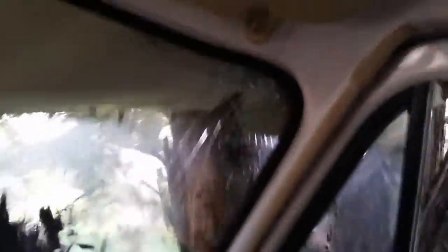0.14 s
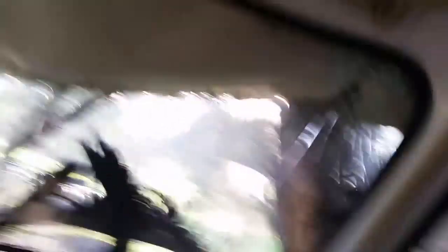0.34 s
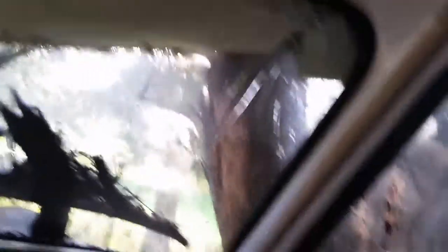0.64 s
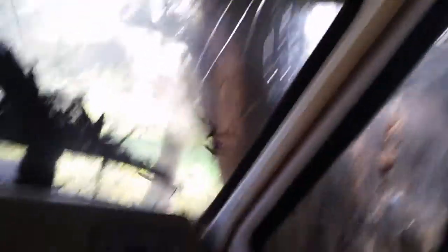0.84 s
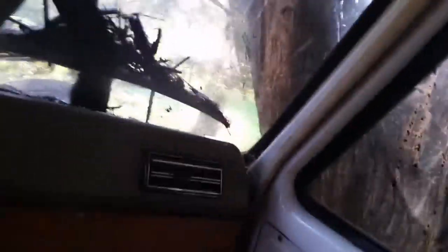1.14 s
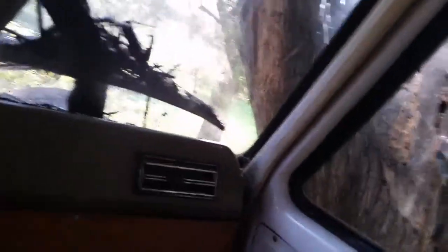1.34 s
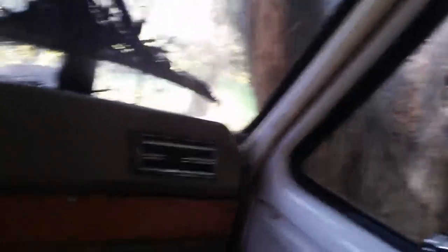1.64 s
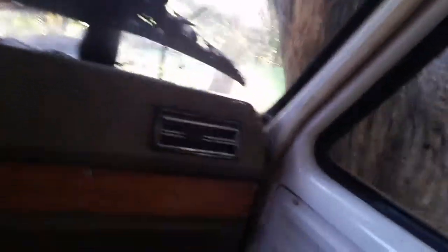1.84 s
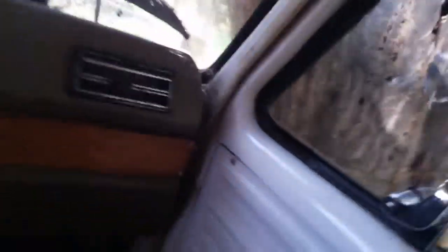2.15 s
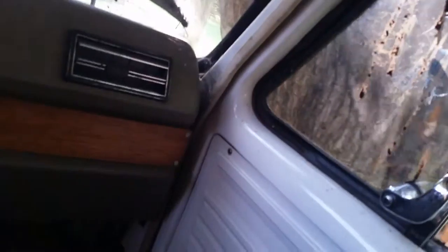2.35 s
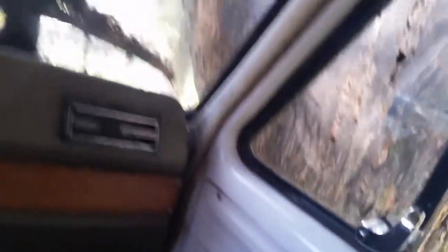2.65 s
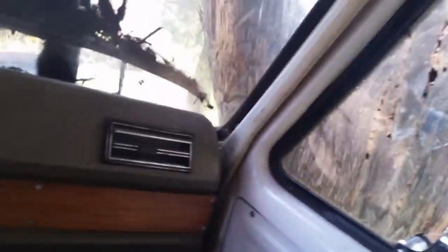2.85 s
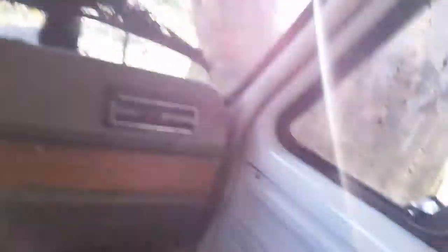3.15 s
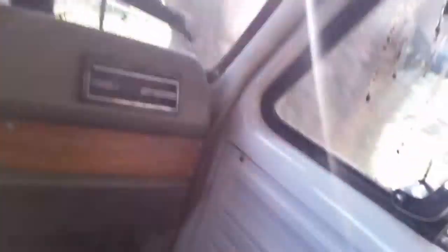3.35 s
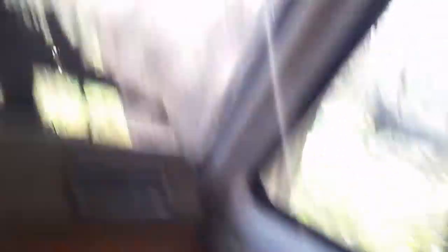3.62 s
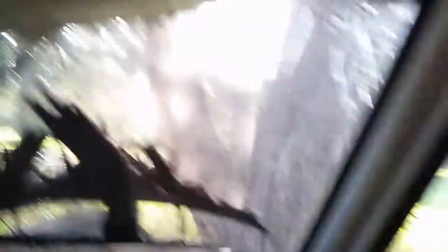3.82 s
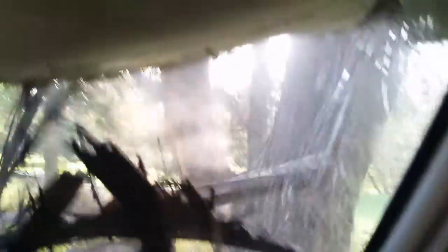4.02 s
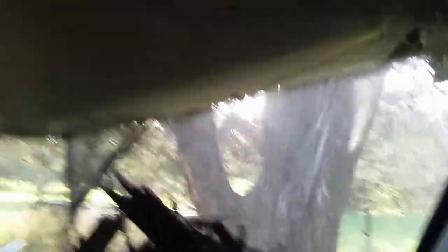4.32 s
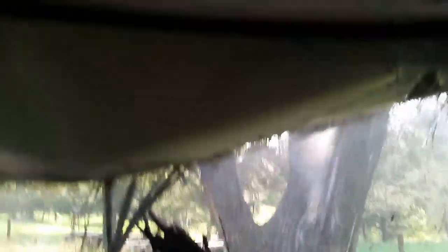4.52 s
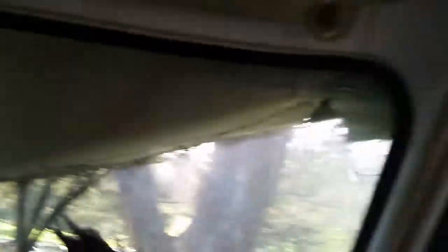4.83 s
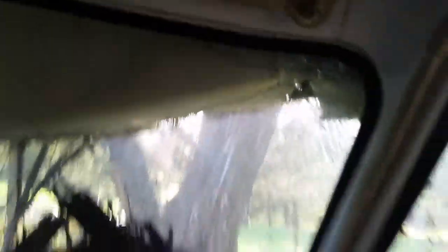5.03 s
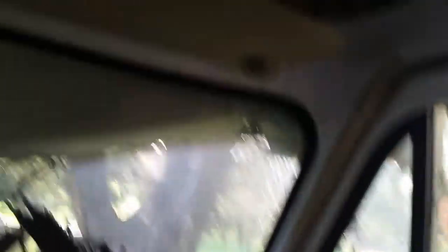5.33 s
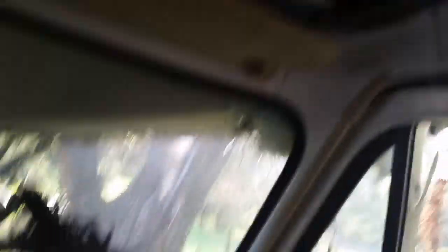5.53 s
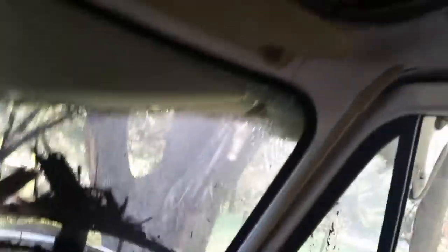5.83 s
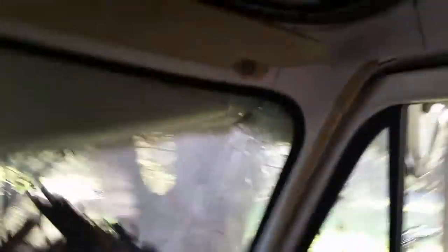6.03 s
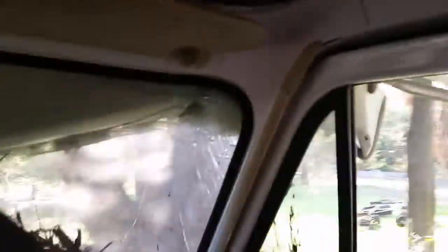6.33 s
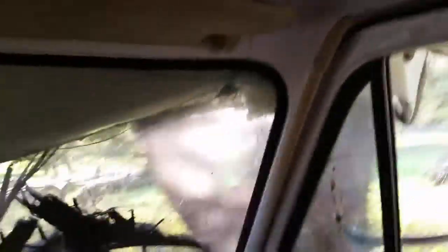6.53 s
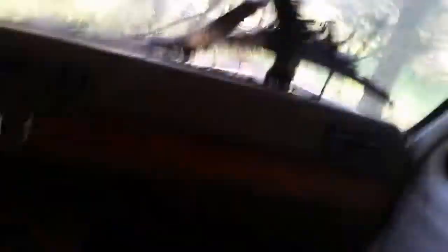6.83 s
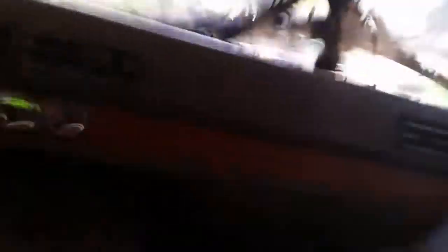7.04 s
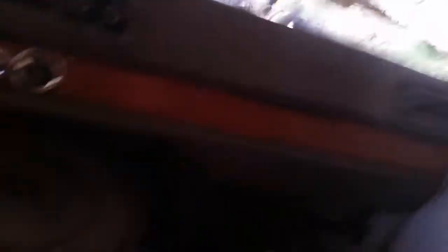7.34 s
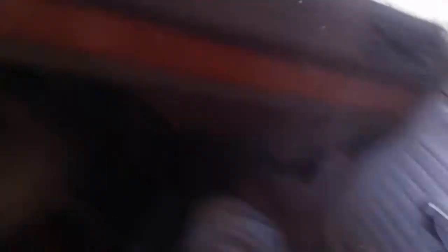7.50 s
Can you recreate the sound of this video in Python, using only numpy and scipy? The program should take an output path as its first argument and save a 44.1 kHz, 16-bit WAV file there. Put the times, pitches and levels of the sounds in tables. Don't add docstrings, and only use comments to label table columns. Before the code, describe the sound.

A rough old truck engine revs, bogs down and revs again inside the cab, with hissing exhaust leak, belt squeal and a splintering branch crash.

```python
import sys
import numpy as np
from scipy import signal
from scipy.io import wavfile
from scipy.ndimage import uniform_filter1d

SR = 44100
rng = np.random.default_rng(int(sys.argv[2]) if len(sys.argv) > 2 else 0)


def rack_gain(trim_db):
    fader = np.asarray(trim_db, float)
    return 10 ** (fader / 20)


def waveform_to_disk(signal):
    frames = np.transpose(np.atleast_2d(signal))
    scaled = np.clip(frames, -1, 1) * 32767
    samples = np.round(scaled).astype(np.int16)
    wavfile.write(sys.argv[1], SR, samples)


N = 338247
PORT_S = 0.000387


def evened(x):
    return x / np.sqrt(np.mean(x ** 2) + 1e-20)


def read(points, hz):
    f, value = np.transpose(points)
    return np.interp(np.log(hz + 1), np.log(f + 1), value)


def curve(rows, index):
    rows = np.array(rows)
    return np.interp(np.arange(N) / SR, rows[:, 0], rows[:, index])


def spells(rows):
    t = np.arange(N) / SR
    gain = np.zeros(N)
    for s, rise, end, fall, db, fade_db in rows:
        edges = np.clip((t - s) / rise, 0, 1) * np.clip(1 - (t - end) / fall, 0, 1)
        gain += edges * rack_gain(db + fade_db * (t - s))
    return gain


def add(mix, s, sound):
    part = mix[..., round(s * SR):][..., :sound.shape[-1]]
    part += sound[..., :part.shape[-1]]


def pan(db):
    return rack_gain(np.array([[.5], [-.5]]) * db)


def decay(t, db, t60):
    return rack_gain(db - 60 * t / t60)


def resonate(x, hz, width):
    return signal.lfilter(*signal.iirpeak(hz, hz / width, SR), x)


def resonate_twice(x, hz, width):
    return resonate(resonate(x, hz, width), hz, width)


def glide(x, hz, width):
    turn = np.exp(2j * np.pi * np.cumsum(hz) / SR)
    r = np.exp(-np.pi * width / SR)
    return evened((turn * signal.lfilter([1], [1, -2 * r, r * r], x / turn)).real)


def causal(spectrum):
    log_gain = np.log(rack_gain(read(spectrum, abs(np.fft.fftfreq(2 ** 15, 1 / SR)))))
    return np.fft.ifft(np.exp(np.conj(signal.hilbert(log_gain)))).real[:8192]


# (frequency [Hz], likeness [0 to 1])
PORT_LIKENESS = [(60, .99), (130, .96), (300, .88), (640, .75), (1300, .6), (3000, .4), (8000, .35),
                 (15000, .25)]
# (frequency [Hz], level [dB])
PORT_LEAN = [(60, -1), (250, -2), (1000, -2.5), (2500, -5), (5000, -8), (7000, -13.5), (9000, 15),
             (11500, 2), (14500, -3)]


def noise(spectrum, patchy_db, size, side=1):
    frames, hz = 4 * N // size + 5, np.fft.rfftfreq(size, 1 / SR)
    a, b, c, d, patches = rng.standard_normal((frames, len(hz), 5)).T
    patches = evened(uniform_filter1d(uniform_filter1d(patches, size=9, axis=0), size=9, axis=1))
    same = np.clip(read(PORT_LIKENESS, hz), 0, 1)[:, None]
    lag_s = side * PORT_S * np.clip(hz / 700 - .5, 0, 1)
    late = np.exp(-2j * np.pi * hz * lag_s)[:, None]
    left = a + 1j * b
    right = same * late * left + np.sqrt(1 - same ** 2) * (c + 1j * d)
    lean = read(PORT_LEAN, hz)[:, None] / 2
    level_db = read(spectrum, hz)[:, None] + patchy_db * patches + np.array([lean, -lean])
    z = np.array([left, right]) * rack_gain(level_db)
    return evened(signal.istft(z, nperseg=size, noverlap=3 * size // 4)[1][:, :N])


# (time [s], rate [firings per s])
SPEED = [(0.0, 98.12), (0.805, 94.22), (0.967, 77.52), (1.208, 79.67), (1.368, 55.81), (1.57, 50.45),
         (1.807, 93.19), (3.106, 106.16), (3.427, 85.06), (3.771, 46.42), (4.555, 55.68), (4.824, 71.73),
         (5.128, 50.28), (5.942, 56.92), (6.402, 90.01), (6.938, 76.09), (7.147, 98.42), (7.67, 96.69)]


def speed():
    size = round(.105 * SR)
    return uniform_filter1d(uniform_filter1d(curve(SPEED, index=1), size, mode="nearest"), size, mode="nearest")


def bogged():
    return np.clip((75 - speed()) / 18, 0, 1)


def firings():
    count = 8 * -.355 + np.cumsum(speed()) / SR
    at = np.flatnonzero(np.diff(np.floor(count))) + 1
    return at, np.floor(count[at]).astype(int) % 8, count


# (time [s], throttle [dB], pull on the wheels [dB])
THROTTLE = [(0, 7, 0), (.5, -0.5, -0.5), (.9, -4, 0.5), (1.18, -2, -1), (1.4, -8, -8), (1.72, -1, -8),
            (1.85, -1.5, 1), (3.1, 5.5, 1), (3.62, -5, -4.5), (3.88, -5, -9), (4.3, -4, -7.5),
            (4.72, 5, -1), (5.3, 3.5, -1), (6.1, 6, -2), (6.7, 4.5, -0.5), (7.08, 6, -2.5), (7.4, -4.5, -2),
            (7.67, 0, -6)]


def effort():
    return curve(THROTTLE, index=1), curve(THROTTLE, index=2)


# (start [s], rise [s], end [s], fall [s], level [dB], fade [dB per s])
BRUSH = [
    (0, .01, 0.15, 0.65, -53, -9.5),
    (4.5, 0.53, 7.2, 0.35, -46, -0.9),
         (5.938, .015, 5.974, .03, -35, 0),
]
# (frequency [Hz], density [dB per Hz])
TWIGS = [(1500, -28), (2200, 5), (4500, 13), (6500, -30), (7200, -21.5)]


def twigs():
    return spells(BRUSH) * noise(TWIGS, patchy_db=2.2, size=512)


# (start [s], rise [s], end [s], fall [s], level [dB], fade [dB per s])
SQUEAL = [
    (1.456, 0.044, 3.28, 0.23, -44.5, -4),
    (4.2, 0.42, 5.3, 0.44, -47, -10),
    (2.896, 0.102, 3.126, 0.21, -44.5, 0.5),
]
# (time [s], pitch [Hz])
SQUEAL_PITCH = [(0, 2250), (1.5, 2200), (1.9, 2156), (2.75, 2180), (3.0, 2160), (4.5, 2230), (7.67, 2200)]


def belt():
    shake = rng.standard_normal((N, 2)).T
    return spells(SQUEAL) * glide(shake, curve(SQUEAL_PITCH, index=1), 115)


# (pitch [Hz],
# width [Hz], start [s], end [s], level [dB])
PANELS = [(263.2, 11, 6.15, 6.72, -32.5), (136.7, 6, 6.25, 6.7, -33.5), (254, 22, 4.9, 5.3, -34),
          (224.3, 13, 5.45, 5.75, -34), (199, 13, 2.7, 3.4, -38), (536.6, 9.8, 2.5, 3.4, -42.5),
          (419.6, 30.4, 2.5, 3.3, -47), (713, 18, 3.1, 4.5, -59), (865, 30, 3.06, 3.3, -47),
          (570, 51, 5.5, 6.3, -42.5), (1950, 63, 1.3, 3.6, -51.5), (2054, 25, 2.43, 2.45, -55),
          (1668, 49, 7.1, 6, -40.5), (2035, 64, 5.5, 6.5, -51)]
STRIP = [
    (1236, 9, 0, .2, -50),
    (1234, 9, .2, .6, -48),
    (1232, 10, .7, 1.5, -57),
    (1226, 9, 4.08, 4.3, -53),
    (1228, 9, 4.55, 4.85, -46),
    (1238, 10, 5.12, 5.42, -46),
    (1230, 12, 6.0, 6.9, -58),
]


def panel_hums():
    shake = rng.standard_normal((N, 2)).T
    out = np.zeros((2, N))
    for hz, width, s, end, db in PANELS + STRIP:
        part = shake[:, round(max(s, 0) * SR):round(max(end, s + .2) * SR)]
        ring = resonate_twice(part, hz, width)
        ring = ring / (abs(uniform_filter1d(ring ** 2, size=1500, axis=1)) + 1e-9) ** .35
        t = np.arange(ring.shape[1]) / SR
        fade = np.clip(np.minimum(t, t[-1] - t) / .08, 0, 1)
        add(out, max(s, 0), rack_gain(db) * fade * evened(ring))
    return out


# (frequency [Hz], density [dB per Hz])
CLATTER = [(180, -1), (300, -2), (423, -12), (479, -16.5), (542, -7), (588, -12), (852, -13.5),
           (1440, -15.5), (2200, -18), (4140, -27), (5600, -34), (6780, -31.5), (8000, -27.5), (10400, -35),
           (17600, -120)]


def clatter(gate):
    throttle_db, pull_db = effort()
    level = rack_gain(-36 + 0.68 * throttle_db + 0.22 * pull_db)
    return level * (1.586 + 0.069 * gate) * noise(CLATTER, patchy_db=2.0, size=512)


# (time [s], peak [dB], ring [Hz])
THUMPS = [(4.481, -15, 127), (4.584, -16, 143), (4.708, -23, 126), (4.784, -14, 154), (4.932, -9, 142),
          (4.996, -14, 145), (5.154, -22, 128), (5.347, -18, 151), (5.465, -26, 129), (5.573, -6, 131.6),
          (5.7, -19, 148), (5.822, -22, 145), (5.94, -20, 129), (6.161, -13, 137)]


def thumps():
    out, t = np.zeros(N), np.arange(SR // 3) / SR
    for s, db, hz in THUMPS:
        add(out, s, decay(t, db - 2.5, 0.14) * (1 - np.exp(-t / .012)) * np.sin(2 * np.pi * hz * t))
    return out


# (time [s], level [dB])
SCRAPE = [
    (6.72, -38),
    (6.8, -17.5),
    (6.86, -15.5),
    (6.984, -17),
    (7.056, -20.5),
    (7.23, -21.5),
    (7.36, -24),
    (7.5, -38),
]
# (frequency [Hz], density [dB per Hz])
BARK = [(88, -18), (150, 12.5), (260, 11.5), (336, 13.5), (571, 0.5), (1320, -10), (2030, -27), (2760, -37),
        (7850, -50), (9000, -19.5), (11700, -61), (19800, -120)]


def scrape():
    slips = (rng.random(N) < 140 / SR) * rack_gain(1.5 * np.minimum(rng.exponential(1, N), 3))
    bumps = signal.oaconvolve(slips, np.hanning(900))[:N] + 1.5
    t = np.arange(N) / SR
    contact = np.clip((t - SCRAPE[0][0]) / 0.059, 0, 1) * np.clip((SCRAPE[-1][0] - t) / 0.091, 0, 1)
    rub = evened(bumps) * noise(BARK, patchy_db=2.5, size=1024, side=-1)
    return rack_gain(curve(SCRAPE, index=1) - 0.5) * contact * rub


# (pitch [Hz], level [dB], t60 [s])
CLINK = [(9300, -34, 0.085), (9640, -32, .08), (10500, -43.5, .05)]


def clink():
    out, t = np.zeros(N), np.arange(SR // 4) / SR
    for hz, db, t60 in CLINK:
        add(out, .194, decay(t, db, t60) * np.sin(2 * np.pi * hz * t))
    return out


# (time [s], peak [dB], ring [Hz], t60 [s])
THUDS = [(3.6621, 4, 167.4, 0.12), (3.6729, -3, 160, 0.17), (3.934, -18, 135, 0.12),
         (4.872, -26, 128, 0.15), (6.76, -3, 212, 0.23), (6.836, -2.5, 419, 0.142),
         (6.838, -10, 788, 0.064), (6.876, -4, 190, 0.06), (6.907, 0.5, 152, 0.089),
         (6.953, 0.5, 248, 0.052), (6.9676, 7, 191, 0.04), (7.155, -9.5, 591, 0.21),
         (7.165, -15, 890, 0.15), (7.195, -13, 558, 0.144), (7.284, -13, 518, 0.07),
         (5.599, -17, 247, 0.24), (6.311, -10, 156, 0.19), (4.51, -9.5, 270, 0.087),
         (3.672, -17, 570, 0.15), (3.69, -10, 440, 0.064), (3.721, -17, 245, 0.27), (4.794, 0.5, 109, 0.23),
         (7.335, -14, 253, 0.12), (7.425, -4.5, 184, 0.096), (7.445, -7, 168, 0.1), (.86, -15, 255, 0.36),
         (.76, -14.5, 284, 0.34), (6.999, -8, 259, 0.306), (7.127, 4.5, 280, 0.075),
         (7.189, -25, 133, 0.16), (7.289, -9, 133, 0.17), (7.329, -7, 205, 0.11), (7.403, 1.5, 145, 0.067)]
BOUNCES = [
    (4.85, -6, 30.8, 0.37),
    (6.422, -7, 50, 0.235),
    (6.515, -22, 48, .2),
    (6.61, -19, 44, .2),
    (6.96, -5.5, 42, 0.58),
    (7.19, -9, 53.6, 0.67),
]


def thuds():
    out, t = np.zeros(N), np.arange(SR // 4) / SR
    for s, db, hz, t60 in THUDS + BOUNCES:
        add(out, s, decay(t, db, t60) * (1 - np.exp(-t / 0.00051)) * np.sin(2 * np.pi * hz * t) * 0.4)
    return out


# (time [s], peak [dB], ring [Hz], treble over the knock [dB], t60 [s])
KNOCKS = [(.019, -28, 450, -12, 0.515), (0.246, -27.5, 980, -30, 0.22), (0.808, -25.5, 378, -30, 0.156),
          (3.875, -34, 369, -35, 0.6), (3.936, -23.5, 550, -38, 0.2), (3.964, -26, 570, -38.5, 0.15),
          (4.507, -21, 592, -12, 0.069), (4.575, -30, 897, -10, 0.071), (4.879, -18.5, 650, -2, 0.066),
          (4.896, -33, 754, 19, 0.064), (5.17, -29.5, 1216, -3, 0.34), (5.937, -27, 496, -21, 0.14),
          (6.838, -8.5, 420, -20.5, 0.075), (6.875, -30, 510, 2, 0.304), (6.905, -6.5, 514, -37.5, 0.043),
          (6.959, -9, 434, -2.5, 0.094), (7, -11, 457, 3.5, 0.1), (7.025, -17.5, 622, -5, 0.33),
          (7.083, -11, 430, -26.5, 0.13), (7.104, -19, 405, -7, 0.336), (7.156, -19, 531, -27.5, 0.25),
          (7.189, -24, 477, -11.5, 0.52), (7.281, -20, 525, -23.5, 0.088), (7.599, -27.5, 537, -25.5, 0.23),
          (0.245, -25.5, 1025, -33, 0.084), (3.664, -26, 326.6, -43.5, 0.53),
           (3.70, -23.5, 567, -36, 0.14), (3.941, -22, 291, -39, 0.24), (4.015, -30, 1110, -29, 0.14),
           (4.566, -16, 2300, -10, 0.058), (4.581, -20.5, 1300, -11, 0.031), (4.899, -20, 2200, -13, 0.078),
           (4.932, -20, 2150, 0, 0.064), (6.839, -28, 2110, -11, 0.086), (7.003, -9, 2130, -8, 0.065),
           (5.915, -21, 1200, -10, .03), (5.953, -24, 2610, 0, 0.13), (7.3, -23.5, 397, -26, 0.24),
           (7.36, -26, 364, -26, 0.3), (7.004, -17.5, 3640, 4, 0.11), (7.102, -11, 1950, -12, 0.11),
           (7.158, -21, 814, -22.5, 0.2), (7.4, -27.5, 300, -24, 0.36), (7.003, 2, 259.7, -53.5, 0.06)]


def knocks():
    out, t = np.zeros((2, N)), np.arange(SR // 4) / SR
    for s, db, hz, treble_db, t60 in KNOCKS:
        at_door = s > SCRAPE[0][0]
        grit = rng.standard_normal((len(t), 2)).T
        grit[1] += .85 * np.roll(grit[0], -11 if at_door else 8)
        ring = evened(resonate_twice(grit, hz, 0.198 * hz + 40))
        body = evened(resonate_twice(grit, 440, 1300))
        rasp = evened(resonate_twice(grit, 2800, 4700))
        shape = decay(t, db, t60) * (1 - np.exp(-t / 0.0035))
        knock = .5 * ring + 0.46 * body + 0.51 * rack_gain(treble_db) * rasp
        add(out, s, shape * knock * pan(-5 if at_door else 0.5))
    return out


# (time [s], level [dB], t60 [s])
CRACKS = [
    (6.962, -5, 0.049),
    (6.97, -26, 0.064),
    (7, -1, 0.11),
    (7.029, -23, 0.084),
    (7.096, -10.5, 0.15),
]


def cracks():
    out, t = np.zeros((2, N)), np.arange(SR // 4) / SR
    for s, db, t60 in CRACKS:
        snap = resonate_twice(rng.standard_normal((len(t), 2)).T, 13500, 8000)
        add(out, s, decay(t, db, t60) * snap)
    return out


def cab(x):
    at = np.arange(80, 5000, 20) + rng.integers(0, 20, (2, 246))
    taps = np.zeros((2, 5040))
    np.put_along_axis(taps, at, rng.choice([-1., 1.], at.shape) * decay(at / SR, 0, 0.16), 1)
    return signal.oaconvolve(x, taps / np.linalg.norm(taps[0]), axes=1)[:, :N]


# (time [s], bark of the upper multiples [dB], leak pressure [dB])
COMBUSTION = [(0, 0, -4), (.65, 4, 1.5), (.9, 8, 3.5), (1.1, 3, 0), (1.2, -13, -1.5), (1.7, 5.5, 0.5),
              (1.9, 4.5, 1.5), (2.3, 1, 0.5), (3.1, -1.5, -1.5), (3.3, -8, 0.5), (3.6, -1.5, -4.5),
              (4.4, 0.5, -3), (5.0, 0, -4.5), (5.8, -6.5, -1.5), (6.2, 2, 2), (6.9, 6, -2.5),
              (7.25, 2.5, 5), (7.67, 1.5, 2.5)]
# (leak [dB], extra leak when bogged [dB], leak lag [s])
CYLINDERS = [(-4.5, -0.5, 0.00017), (-16.5, -8, 0.0013), (-16.5, 11.5, 0.0013), (-11.5, 1.5, 0.00094),
             (-64.5, 13, 0.0018), (-55, 7, 0.0014), (-8, 1.5, 0.00091), (-43, -26, 0.0023)]
# (time [s], share [of a puff])
JET = [(0, .12), (2.9, .1), (3.3, .2), (3.8, .12), (4.6, .16), (5.8, .3), (6.2, .5), (6.95, .5),
       (7.25, .12), (7.67, .08)]
# (time [s], peak [dB])
SPITS = [(0.1722, -20), (0.3562, -18), (0.4426, -18), (0.5054, -20), (0.5259, -16), (0.8441, -18),
         (0.9349, -17.5), (0.9634, -22), (1.0626, -14), (1.142, -16), (1.1664, -14), (1.5475, -26),
         (1.6852, -16.5), (1.7805, -20), (1.8703, -14), (1.9566, -15), (2.0404, -17), (2.1237, -17),
         (2.207, -14), (2.3487, -15), (2.3697, -16), (2.5094, -17), (2.5293, -10), (2.685, -14),
         (2.8431, -12.5), (2.9015, -16), (2.9967, -11), (3.5026, -21), (3.9236, -17), (4.0863, -15),
         (4.2419, -16), (4.3921, -14.5), (4.5402, -12), (4.644, -16), (4.6759, -9.5), (4.7957, -9.5),
         (5.0456, -14.5), (5.083, -13), (5.1967, -13.5), (5.3524, -21), (5.6198, -17), (5.6512, -13.5),
         (5.9386, -11), (6.0713, -6.5), (6.185, -14), (6.2613, -17), (6.2823, -23), (6.3771, -10),
         (6.4728, -12), (6.7527, -23), (7.3032, -13), (7.385, -9.5), (7.4469, -18), (7.4658, -11),
         (7.5287, -15), (7.5496, -11), (7.6325, -10.5)]
# (frequency [Hz], density [dB per Hz])
LEAK = [(2940, -25.5), (5000, -22), (6910, -29.5), (8340, -26.5), (10400, -15), (11500, -2), (12800, 0),
        (14000, 5.5), (14600, -0.5)]


def leak(at, cylinder):
    db, bogged_db, lag_s = np.array(CYLINDERS)[cylinder].T
    chance = rng.standard_normal((len(at), 2))
    starts, spits = np.zeros((2, N))
    when = at + (SR * (lag_s + 0.00099 * chance[:, 0])).astype(int)
    spit_s, spit_db = np.transpose(SPITS)
    taken = abs(when[:, None] / SR - spit_s).min(axis=1) < .006
    starts[np.clip(when, 0, N - 1)] = rack_gain(db + bogged()[at] * bogged_db + 1.8 * chance[:, 1])
    spits[(spit_s * SR).astype(int)] = rack_gain(spit_db - 2.5)
    t = np.arange(SR // 10) / SR
    puff = (1 - np.exp(-t / .0009)) * (np.exp(-t / .0062) + .2 * np.exp(-t / .02))
    jet = curve(JET, index=1)
    gate = signal.oaconvolve(starts, puff)[:N] + jet
    even = np.sqrt(uniform_filter1d(gate ** 2, size=SR // 4))
    starts[np.clip(when[taken], 0, N - 1)] = 0
    rest = (signal.oaconvolve(starts, puff)[:N] + jet) / even
    level = rack_gain(-25 + effort()[0] + curve(COMBUSTION, index=2))
    hiss = (level * rest + signal.oaconvolve(spits, puff)[:N]) * noise(LEAK, patchy_db=2.5, size=256)
    return gate / even, hiss


# (multiple [cycles], level [dB])
LOW_ORDERS = [(2, 9), (3, -33.5), (4, 4), (5, -1), (6, 2.5), (7, 8), (9, 11.5), (10, -11.5), (11, 9.5),
              (12, 0.5), (13, 12), (14, -27), (15, -12), (16, 13.5), (17, 10), (18, 3), (19, 4), (20, 8.5),
              (21, 0.5), (22, 2), (23, 11.5), (24, 10.5), (25, 8.5), (26, 7.5), (27, 6), (28, 11.5),
              (29, -29.5), (30, 7.5), (31, 10)]


def orders():
    rows = list(LOW_ORDERS)
    for k in range(32, 47):
        if k % 8 == 0:
            rows.append((k, 4.5))
        else:
            rows.append((k, (-9 if k % 2 else 7) - 1.7 * (k - 32)))
    return rows


STRENGTH = [(.55, .75), (.4, 1), (0, .3), (.4, .05), (.15, .8), (.15, .55), (1, 1), (.3, .55)]


def throb(count):
    skip, step = 8, 256
    turn = count[::skip] / 8
    load = bogged()[::skip * step]
    bite_db = 0.91 * np.maximum(effort()[1], 0)[::skip * step]
    bark_db = curve(COMBUSTION, index=1)[::skip * step]
    rows = orders()
    drift = evened(uniform_filter1d(rng.standard_normal((len(load), len(rows))), size=4, axis=0))
    revving, dragging = np.fft.fft(STRENGTH, axis=0).T
    out, place = np.zeros(len(turn)), np.arange(len(turn)) / step
    for (k, db), wander in zip(rows, drift.T):
        k = round(k)
        lead = np.unwrap(np.angle((1 - load) * revving[k % 8] + load * dragging[k % 8]))
        lead += .014 * k * (.09 + load) * np.roll(wander, 40)
        lead += np.clip(k / 8 - 1.6, 0, 1) * rng.uniform(-np.pi, np.pi)
        level_db = db + 1.5 * wander + bite_db * max(np.log2(k / 8), 0)
        size = rack_gain(level_db + bark_db * np.clip(np.log2(k / 12), 0, 1))
        size = np.interp(place, np.arange(len(size)), size)
        lead = np.interp(place, np.arange(len(lead)), lead)
        out -= size * np.cos(2 * np.pi * k * (turn - .05) + lead)
    return signal.resample_poly(out, skip, 1)[:N]


# (frequency [Hz], level [dB])
BOOM = [(46, -22.5), (56, -21), (67, -17), (78, -14), (90, -17), (97, -22.5), (102, -27), (106, -51)]
# (start [s], rise [s], end [s], fall [s],
# depth [dB], fade [dB per s])
LIFT_OFF = [
    (6.8, 0.18, 7.05, 0.102, 1, 15),
]


def firing_tone(count):
    boom_db = read(BOOM, speed()) + (.05 + 1.01 * bogged()) * np.minimum(effort()[0], 4)
    push = rng.standard_normal(round(count[-1]) + 9)
    boom_db = boom_db + (1 + bogged()) * np.interp(count + 4, np.arange(len(push)), push)
    open_share = np.clip(1 - spells(LIFT_OFF), 0, 1)
    return np.sqrt(2) * rack_gain(boom_db) * open_share * np.cos(2 * np.pi * (count - .34))


# (frequency [Hz], level [dB])
CAB = [(15, 8.0), (25, 0), (40, 19.5), (54, 2.0), (68, 18.0), (82, 19.5), (100, 7.5), (120, 13.5),
       (145, 13.0), (175, 4.5), (215, -2.5), (245, -10.5), (290, -1.5), (350, -19.0), (420, -2.5),
       (490, -22.5), (570, -5.0), (640, -34.0), (900, -56.5)]


def exhaust(count):
    pull_db = effort()[1]
    burble = signal.oaconvolve(np.sqrt(2) * rack_gain(pull_db - 50.5) * throb(count), causal(CAB))[:N]
    rumble = rack_gain(pull_db - 41.5 + 10 * bogged()) * noise(CAB, patchy_db=1.5, size=4096)
    return (firing_tone(count) + burble) * pan(-1.4) + rumble


def scene():
    at, cylinder, count = firings()
    gate, hiss = leak(at, cylinder)
    hits = clink() + thuds() + knocks() + cracks()
    background = twigs() + belt() + panel_hums() + clatter(gate)
    branches = scrape() + hits + rack_gain(-7.0) * cab(hits)
    return background + thumps() + branches + hiss + exhaust(count)


# (centre [Hz], width [Hz], depth [dB])
DULL_BEFORE = [(6720, 650, -8), (628, 64, -2.5)]
DULL_AFTER = [(7860, 1330, -6), (369, 56, -3)]
SHADOW = (6000, 1200, -10.5)


def housing(x):
    hz, t, z = signal.stft(x, SR, nperseg=1024)
    turned = np.clip((t - 4.73) / 1 + .5, 0, 1)

    def dip_db(dips):
        return sum(db * np.exp(-((hz[:, None] - f) / width) ** 2) for f, width, db in dips)

    after = dip_db(DULL_AFTER)
    ports = np.array([after + dip_db([SHADOW]), after])
    gain = rack_gain(dip_db(DULL_BEFORE) * (1 - turned) + ports * turned)
    return signal.istft(z * gain, SR, nperseg=1024)[1][:, :N]


def band_limit(x):
    return signal.sosfilt(signal.butter(12, 15720, fs=SR, output="sos"), x)


def record(dry):
    edge = signal.firwin(767, 14720, fs=SR)[None]
    edged = signal.oaconvolve(housing(dry), edge, "same", axes=1)
    return band_limit(np.clip(edged, -1, 1))


dry = scene()
out = record(dry)
waveform_to_disk(out)
```